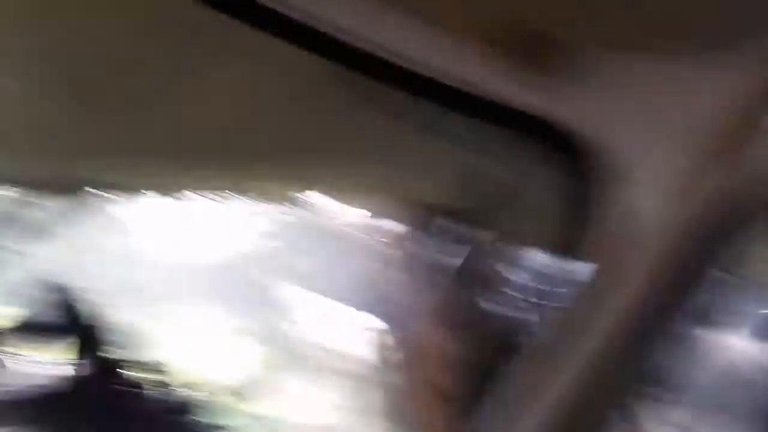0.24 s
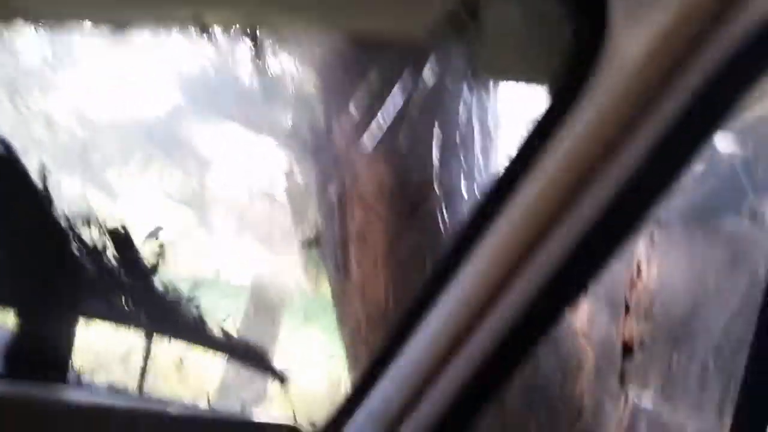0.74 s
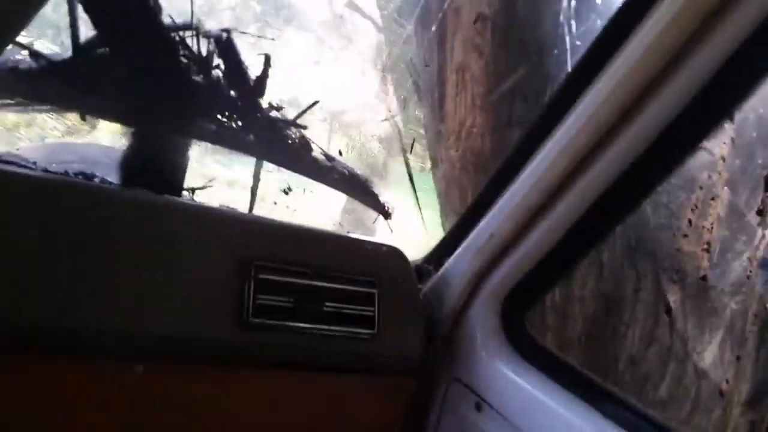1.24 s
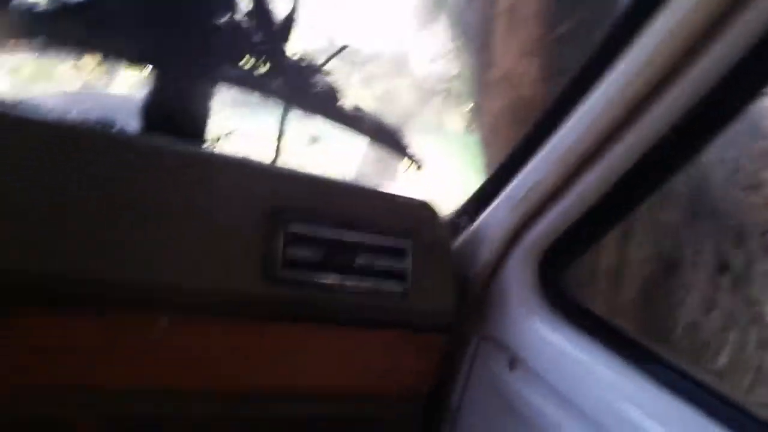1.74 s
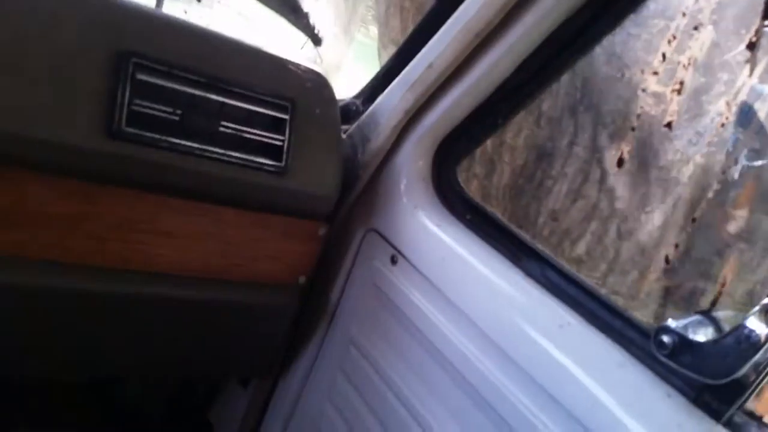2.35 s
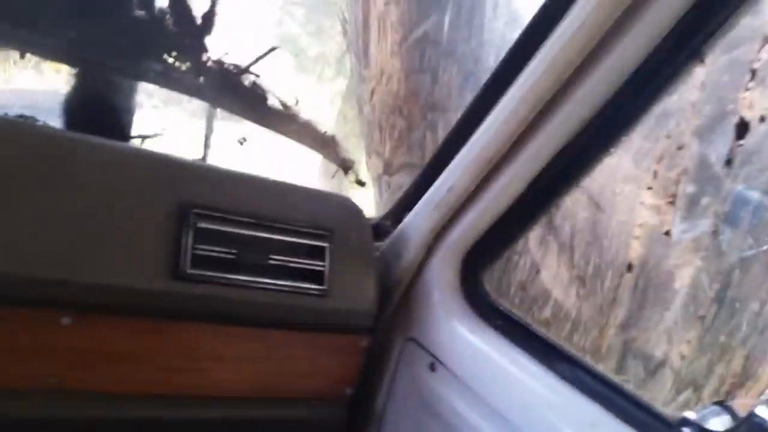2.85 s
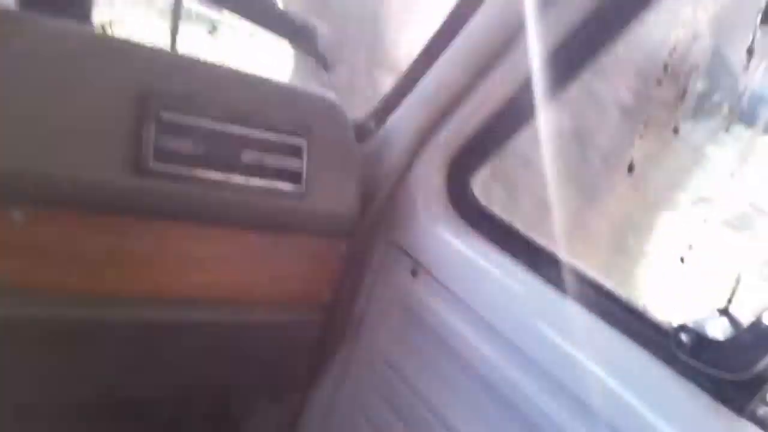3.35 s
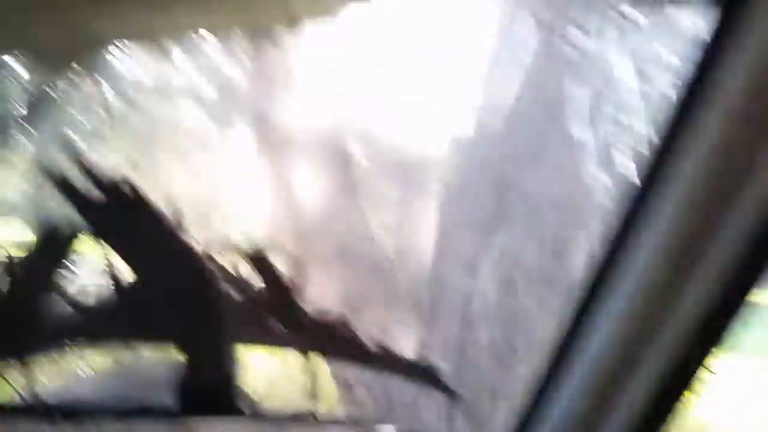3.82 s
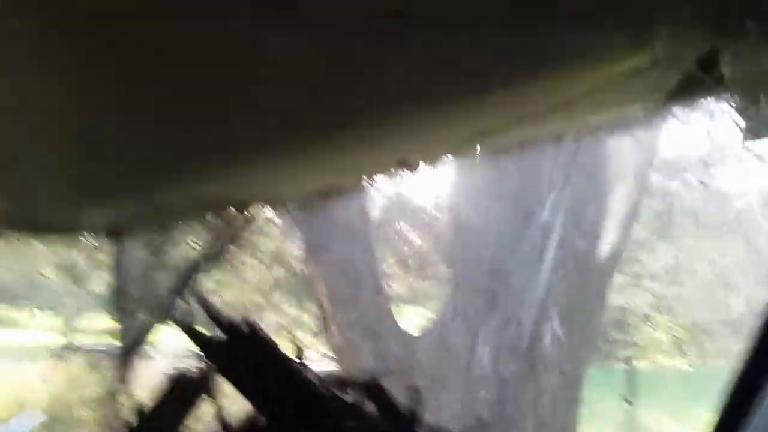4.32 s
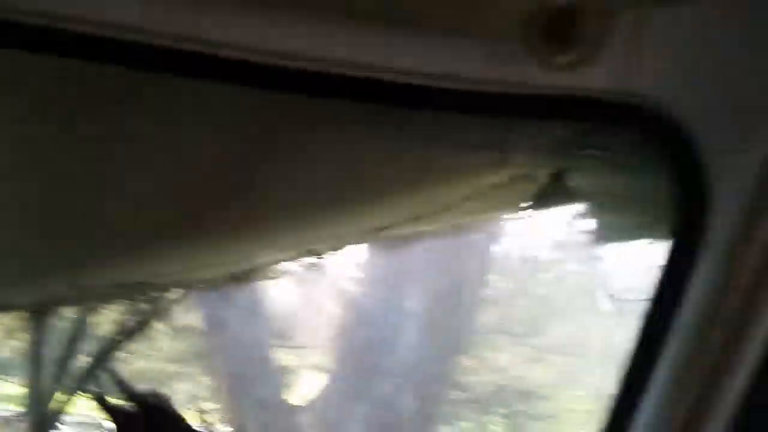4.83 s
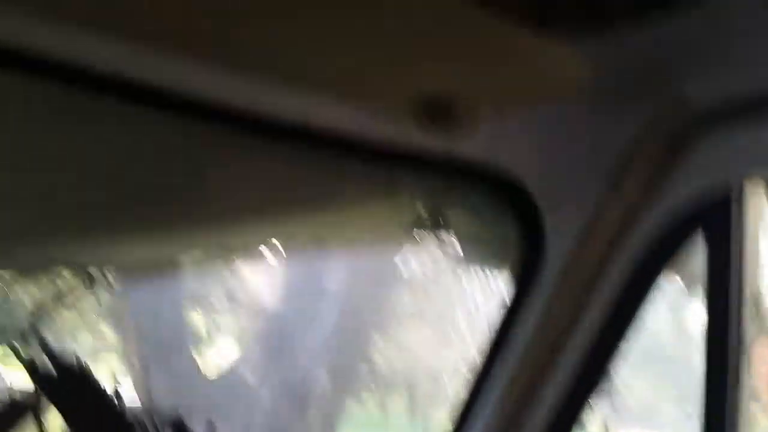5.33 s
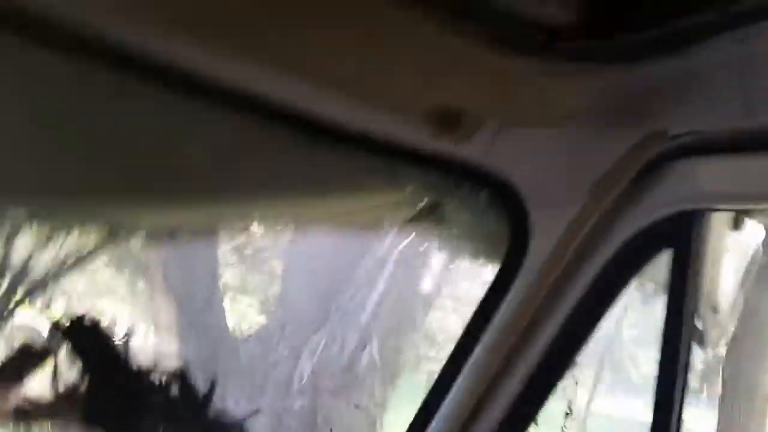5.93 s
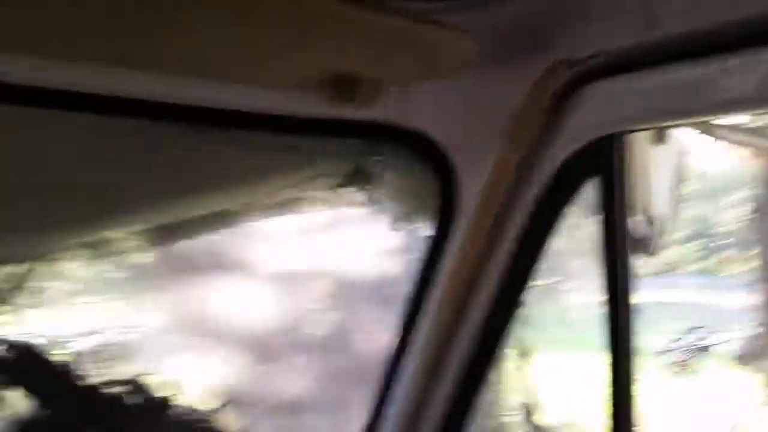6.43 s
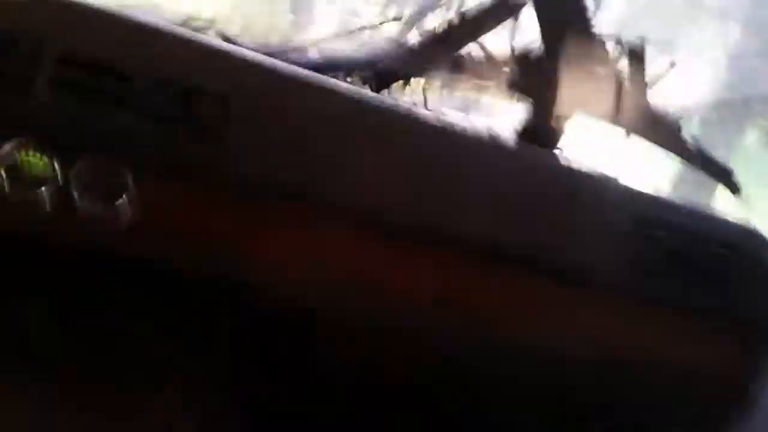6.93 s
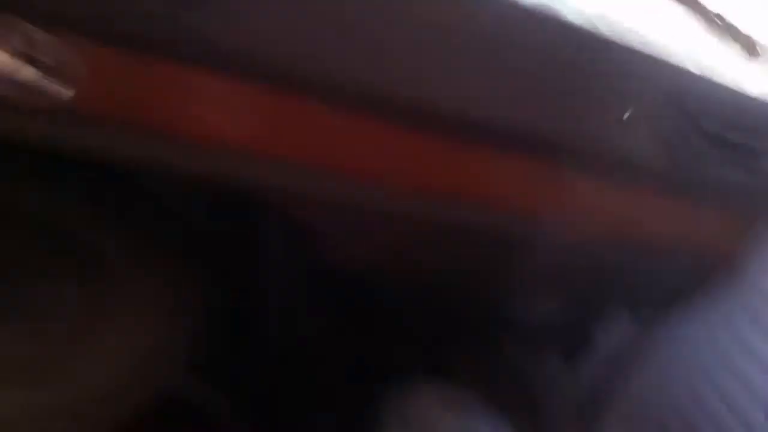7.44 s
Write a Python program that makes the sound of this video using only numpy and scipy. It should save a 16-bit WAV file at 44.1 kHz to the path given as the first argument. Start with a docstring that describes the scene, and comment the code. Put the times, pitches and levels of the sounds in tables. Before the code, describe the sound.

Handheld stereo microphone in a boxy metal cab: heavy uneven engine drone, dominant and bassy, rising, sagging to a lumpy near-idle, then pulling again. Fluttering exhaust-leak hiss rides on it, with key-like rattles, thin wood squeals and a buzzing panel. One dull bump shakes the floor, twigs tap and leaves brush the side, then a late jolt bangs loose trim and doors.

```python
"""Inside the cab of an old V8 truck crawling through woods, heard close up through two microphone ports.
From the start the throttle opens and eases: speed and load drive the exhaust's boom and burble and the
cab's drone, a leak on one cylinder bank hisses at its firings, something small rattles brightly,
branches scrape and squeal and a panel buzzes. Before halfway a bump thuds through the floor pan; later
twigs and leaves brush the side, and near the end a jolt sets the cab clattering as the exhaust drops."""
import sys
import numpy as np
from scipy import signal
from scipy.fft import irfft, next_fast_len
from scipy.io import wavfile
from scipy.ndimage import uniform_filter1d

SR = 44100
rng = np.random.default_rng(int(sys.argv[2]) if len(sys.argv) > 2 else 0)


def wrap_up_sound(samples):
    """Save the sound to the file named by the first command line argument, as 16-bit audio."""
    columns = np.atleast_2d(samples).T
    # keep every value between -1 and 1, then stretch to whole-number steps
    tamed = np.clip(columns, -1, 1)
    steps = np.round(tamed * 32767).astype(np.int16)
    wavfile.write(sys.argv[1], SR, steps)


N = 338247
TIME = np.arange(N) / SR  # [s]


def amp(db):
    """Decibels to gain."""
    return np.exp(np.asarray(db) * (np.log(10) / 20))


def evened(x):
    """Scales to rms 1."""
    return x / np.sqrt(np.mean(x ** 2) + 1e-20)


def read(points, hz):
    """Reads a table of (frequency [Hz], value) on a logarithmic frequency axis."""
    f, value = np.transpose(points)
    return np.interp(np.log(hz + 1), np.log(f + 1), value)


def curves(rows):
    """The columns of a table of (time [s], ..) at every sample."""
    s, *columns = np.transpose(rows)
    return [np.interp(TIME, s, column) for column in columns]


def add(mix, s, sound):
    """Mixes a sound in from time s, cut off at the end of the mix."""
    part = mix[..., max(round(s * SR), 0):][..., :sound.shape[-1]]
    part += sound[..., :part.shape[-1]]


def arch(s, length):
    """Swells from zero to one and back over the given time."""
    return np.sin(np.pi * np.clip((TIME - s) / length, 0, 1))


def wander(rate_hz):
    """Smooth chance of rms 1 that changes at about the given rate."""
    points = rng.standard_normal(size=16384)
    return evened(np.interp(TIME * rate_hz, np.arange(len(points)), points))


def colour(x, spectrum, size=16384):
    """Minimum-phase filter with the given spectrum: it rings after each pulse, never before."""
    hz = abs(np.fft.fftfreq(size, 1 / SR))
    log_gain = np.log(amp(read(spectrum, hz)))
    response = np.exp(np.conj(signal.hilbert(log_gain)))
    ring = np.fft.ifft(response).real[:size // 2]
    return signal.oaconvolve(x, ring)[:N]


# likeness of the two microphone ports: (frequency [Hz], likeness [0-1])
PORT_LIKENESS = [(60, 1), (120, 0.75), (240, 0.37), (480, 1), (950, 0.77), (1900, 0.079), (3800, 0),
                 (15000, 0.38)]
# level of the left port over the right: (frequency [Hz], level [dB])
PORT_LEAN = [(60, 4.5), (140, -5), (500, -1.5), (1170, -3.5), (1790, -5.5), (2740, -4), (4190, -4),
             (6400, -9.5), (9800, 9), (12000, 1.5), (15000, -4)]
# phase by which the left port leads: (frequency [Hz], phase [rad])
PORT_LEAD = [(100, 0.03), (400, 0.52), (700, 0.98), (1100, 1.42), (2000, 4.75)]


def noise(spectrum, size=N, ripple_db=1.8, ripple_hz=28):
    """Coloured noise at the two ports, as alike as the table says, rippled by the cab's standing waves."""
    n = next_fast_len(size, True)
    hz = np.fft.rfftfreq(n, 1 / SR)
    a, b, c, d = rng.standard_normal((4, len(hz)))
    ripple = np.interp(hz / ripple_hz, np.arange(2000), rng.uniform(-1.7, 1.7, size=2000))
    ripple *= np.interp(hz, [100, 500, 2500, 9000], [0, 1, 1, .3])
    same = np.clip(read(PORT_LIKENESS, hz), 0, 1)
    lean = amp(read(PORT_LEAN, hz) / 2)
    left = a + 1j * b
    right = same * left + np.sqrt(1 - same ** 2) * (c + 1j * d)
    right = right * np.exp(-1j * read(PORT_LEAD, hz))
    gain = amp(read(spectrum, hz) + ripple_db * ripple)
    ports = np.array([left * lean, right / lean]) * gain
    return evened(irfft(ports, n)[:, :size])


# heaves of the body: (time [s], length [s], level [dB], frequency [Hz])
SWAYS = [(4.792, 0.2, -16, 30.6), (6.817, 0.53, -24, 37.8)]


def sway():
    """The body heaves on its springs: a very deep tone of pressure swells and fades."""
    out = np.zeros(N)
    for s, length, db, hz in SWAYS:
        out += amp(db) * arch(s, length) * np.sin(2 * np.pi * hz * (TIME - s))
    return out


# thin tones: wood squealing on glass and paint, and a cab panel buzzing near 536 Hz:
# (time [s], length [s], level [dB], start [Hz], end [Hz], flutter [0-1])
THIN_TONES = [(0.197, 0.38, -45.5, 1245, 1230, 0.3), (1.471, 0.6, -44, 2245, 2180, 0.86),
              (1.49, 0.78, -52, 2014, 2060, 0.9), (2.43, 0.19, -42, 537, 537, .3),
              (2.634, 0.85, -40.5, 535, 536, 0.4), (2.944, 0.12, -41, 2270, 2190, .6),
              (4.087, 0.27, -49.5, 1233, 1215, 0.4), (4.58, 0.27, -45, 1220, 1223, 0.1),
              (5.13, 0.3, -45.5, 1226, 1223, .3), (7.095, 0.026, -23, 880, 877, .4),
              (7.15, 0.077, -21, 610, 541, 0.4), (7.156, 0.058, -29, 967, 839, 0.16)]


def squeals_and_buzz():
    """Thin tones of wood and panel that swell and glide; the more flutter, the more they waver and spread."""
    out = np.zeros(N)
    drift = np.cumsum(9 * wander(60)) / SR  # 9 Hz rms, counted in turns
    unsteady = (wander(110) + 1j * wander(110)) / np.sqrt(2)
    for s, length, db, start_hz, end_hz, flutter in THIN_TONES:
        glide_hz = np.interp(TIME, [s, s + length], [start_hz, end_hz])
        turns = np.cumsum(glide_hz) / SR + drift
        sway_of_tone = np.sqrt(max(1 - flutter ** 2, 0)) + flutter * unsteady
        tone = (sway_of_tone * np.exp(2j * np.pi * turns)).imag
        out += amp(db) * np.sqrt(abs(arch(s, length))) * tone
    return out


# branches dragging on glass and paint:
# (time [s], length [s], level before the stroke and slips [dB], centre [Hz], width [octaves])
SCRAPES = [(0, 0.14, -32, 476, 0.74), (0.188, 0.044, -35, 9400, 0.058), (0.236, 0.055, -33.5, 955, 0.29),
           (1.472, 0.45, -47, 2180, 0.12), (2.853, 0.59, -42.5, 2100, 0.25), (3.679, 0.12, -36, 540, 0.67),
           (3.881, 0.16, -36.5, 527, 0.82), (3.998, 0.052, -35.5, 1050, 0.22),
           (4.56, 0.037, -33.5, 2380, 0.34), (4.57, 0.036, -31, 930, 1), (4.869, 0.045, -35.5, 680, 0.071),
           (4.881, 0.068, -32, 3500, 0.9), (5.935, 0.071, -31.5, 2660, 0.86), (5.401, 0.88, -41, 577, .15),
           (7.1, 0.045, -24.5, 1990, 0.16), (7.147, 0.09, -28, 585, 0.27), (7.562, 0.18, -36, 570, 0.51)]


def scrapes():
    """A branch catches, slips in small jerks and slides off: a band of noise under a jerky stroke."""
    out = np.zeros((2, N))
    slips = evened(amp(6 * np.tanh(wander(700))))
    hz = np.geomspace(50, 16000, 400)
    for s, length, db, centre_hz, octaves in SCRAPES:
        band_db = -20 * np.log10(1 + (np.log2(hz / centre_hz) / octaves) ** 4)
        window = SR if length > .2 else SR // 5
        progress = np.minimum(TIME[:window] / length, 1)
        stroke = np.sin(np.pi * progress ** .7)
        add(out, s, amp(db) * noise(np.c_[hz, band_db], size=window) * stroke)
    return out * slips


# bumps heavy enough to shake the floor pan: (time [s], relative level [dB])
BUMPS = [(3.662, -1.5), (6.955, -5)]
# the cab's hollow boom: (frequency [Hz], relative level [dB], t60 [s])
PANEL = [(129, -42, 0.38), (170, 3.5, 0.14), (238, -22, 0.3), (283, -23, 0.031)]


def bumps(rise_s=0.0087):
    """The floor pan swells into a short hollow boom of a few decaying modes."""
    out, t = np.zeros(N), TIME[:SR // 2]
    ring = np.zeros(len(t))
    for hz, db, t60 in PANEL:
        ring += amp(db) * np.exp(-np.log(1000) * t / t60) * np.sin(2 * np.pi * hz * t)
    for s, db in BUMPS:
        add(out, s, amp(db) * ring * (1 - np.exp(-t / rise_s)))
    return out * amp([[-1.1], [1.1]])


CLATTER_DB, CLATTER_PER_HARDNESS = -4, 0.44  # harder blows shake more loose trim


def shares(thud_db, hard_db):
    """Relative thud, clatter and crack of a blow in dB, from its strength and hardness."""
    clatter_db = thud_db + CLATTER_DB + CLATTER_PER_HARDNESS * hard_db
    return thud_db, clatter_db, thud_db + hard_db


# blows on the body: (time [s], relative thud level [dB], hardness: relative crack above thud [dB],
# pitch of the struck part [Hz])
BLOWS = [(0.252, -24.5, -13, 329), (3.661, -20, -22, 302), (3.687, -25.5, -19, 560), (3.939, -25, -9, 420),
         (4.459, -27.5, -14, 187), (4.508, -24, -24, 295), (5.674, -25, -25, 245), (6.757, -17, -40, 210),
         (6.801, -16.5, -13.5, 291), (6.836, -10.5, -18.5, 430), (6.873, -16.5, -11, 344),
         (6.91, -14, -14, 400), (6.962, -13.5, -2.5, 248), (7.001, -12, 3.5, 247), (7.027, -20, -14, 476),
         (7.088, -18, 0, 328), (7.128, -12.5, -11.5, 283), (7.166, -21, -7, 404), (7.195, -17.5, -10, 255),
         (7.24, -23, -12, 344), (7.281, -21.5, -14, 513), (7.3, -19, -42, 132), (7.328, -15, -44, 224),
         (7.402, -18, -40, 150), (7.425, -20, -30, 135)]
# modes of doors and dashboard: (frequency [Hz], relative level [dB], t60 [s])
TRIM = [(237, -21, 0.18), (302, 4, 0.42), (385, 19, 0.034), (468, -5, 0.59), (545, 3, 0.23),
        (692, -9, 0.55), (870, -4, 0.23), (1000, -43, 0.11)]


def trim(ring_db=-9, rise_s=0.015, unlike=0.74):
    """Every blow rings the doors and dashboard, each port hearing its own mix of their modes."""
    out, t = np.zeros((2, N)), TIME[:SR // 3]
    rings = np.array([amp(db) * np.sin(2 * np.pi * hz * t) * np.exp(-np.log(1000) * t / t60)
                      for hz, db, t60 in TRIM])
    rings *= 1 - np.exp(-t / rise_s)
    for s, thud_db, hard_db, _ in BLOWS:
        _, clatter_db, _ = shares(thud_db, hard_db)
        signs = rng.choice([-1, 1], size=len(TRIM))
        weights = signs + unlike * rng.standard_normal((2, len(TRIM)))
        add(out, s, amp(clatter_db + ring_db) * weights @ rings)
    return out


# partials of a struck part: (ratio to its pitch, relative level [dB])
KNOCK_PARTIALS = [(1, -4.5), (1.68, -13), (2.37, -23), (3.6, -21)]


def knock(hz, t60, rise_s):
    """A struck part rings at its own pitch; the overtones die sooner, and the left port leads."""
    t, lead = TIME[:SR // 4], np.array([[.5], [-.5]])
    ring = np.zeros((2, len(t)))
    for ratio, db in KNOCK_PARTIALS:
        phase = 2 * np.pi * hz * ratio * t + lead * read(PORT_LEAD, hz * ratio)
        ring += amp(db - 60 * t * ratio / t60) * np.sin(phase)
    return ring * (1 - np.exp(-t / rise_s)) * amp([[-1], [1]])


# twigs tapping the glass: (time [s], relative level [dB], pitch [Hz])
TWIGS = [(4.566, -25, 2230), (4.581, -40, 1060), (4.898, -23, 2210), (5.915, -29, 934), (5.943, -31, 934),
         (6.029, -30, 1030), (6.415, -27, 2210)]


def knocks(part_db=4, part_t60=0.17, shove_db=9, shove_s=0.00099, twig_t60=0.081):
    """Each blow shoves the air once and rings a part with a pitch of its own; twigs tap the glass."""
    out, u = np.zeros((2, N)), TIME[:SR // 20] / shove_s
    shove = u * (2 - u) * np.exp(-u)
    for s, thud_db, _, hz in BLOWS:
        add(out, s, amp(thud_db + part_db) * knock(hz, part_t60, 0.0017))
        add(out, s, amp(thud_db + shove_db) * shove)
    for s, db, hz in TWIGS:
        add(out, s, amp(db) * knock(hz, twig_t60, 0.00033))
    return out


# what a blow sets ringing, low, middle and top: (frequency [Hz], relative level [dB per Hz])
THUD = [(30, 2), (90, 12.5), (165, 3.5), (250, 11.5), (330, 2), (450, 1), (900, -29), (2500, -81)]
CLATTER = [(150, -10), (300, -10), (480, -8.5), (720, -12), (1000, -16.5), (1500, -22.5), (2500, -28),
           (7000, -54)]
CRACK = [(500, -30), (1200, 15.5), (2100, 11.5), (4000, 9.5), (5500, 6.5), (7300, -2), (9500, 6),
         (12500, 20.5), (15000, 17)]
BLOW_T60_S = 0.22  # scaled a little for each of the three bands
# loose things go on rattling through the jolt; levels relative, as in BLOWS
JOLT_S, JOLT_LENGTH_S, JOLT_DB, JOLT_HARD_DB = 6.76, 0.62, -32, -10


def blows(loose_db=3):
    """Blows ring the cab low, the loose trim in the middle, and crack on top; the jolt adds rattling."""
    out, t = np.zeros((2, N)), TIME[:SR // 2]
    loose = arch(JOLT_S, JOLT_LENGTH_S) * evened(amp(loose_db * wander(68)))
    # spectrum, rise [s], share of the t60, gain [dB]
    bands = [(THUD, .003, 1.0, 1), (CLATTER, .002, 1.05, 3), (CRACK, .0008, .9, 5)]
    for k, (spectrum, rise_s, ring, db) in enumerate(bands):
        power = (amp(shares(JOLT_DB, JOLT_HARD_DB)[k]) * loose) ** 2
        fall = (1 - np.exp(-t / rise_s)) * np.exp(-np.log(1000) * t / (BLOW_T60_S * ring))
        for s, thud_db, hard_db, _ in BLOWS:
            add(power, s, (amp(shares(thud_db, hard_db)[k]) * fall) ** 2)
        out += noise(spectrum) * np.sqrt(power) * amp(db)
    return out


# high hiss, shared by the small rattle and the exhaust leak: (frequency [Hz], relative level [dB per Hz])
HISS = [(1500, -29), (4500, -17), (6800, -25), (8200, -15), (9600, -15), (10800, -1.5), (11800, 7),
        (13200, 13), (14600, 9.5), (16000, -16)]
# bright ticks of something small rattling, such as keys: (time [s], relative level [dB])
RATTLES = [(0.443, -19), (0.844, -18), (1.063, -17), (1.686, -19), (1.957, -23), (2.124, -21), (2.207, -18),
           (2.37, -21), (2.528, -12), (2.902, -21), (2.922, -21), (4.087, -15.5), (4.242, -20),
           (4.392, -16), (4.541, -13), (5.938, -14), (6.071, -16), (7.383, -17), (7.447, -23),
           (7.465, -12.5), (7.55, -20), (7.633, -14)]


def small_rattle(fade_s=0.0059, tick_db=-2):
    """Something small, such as keys, rattles in bright ticks: short bursts of high hiss."""
    level, t = np.zeros(N), TIME[:SR // 8]
    burst = np.exp(-t / fade_s) - np.exp(-t / 0.00048)
    for s, db in RATTLES:
        add(level, s, amp(db + tick_db) * burst)
    return noise(HISS) * level


# push of each cylinder in firing order, the second weak when pulling: (pulling, near idle), relative
CYLINDERS = [(0.93, 0.59), (0.52, 1.09), (1.09, 0.2), (0.82, 0.58), (1.53, 1), (1.43, 0.075), (0.79, 0.11),
             (1.125, 1.44)]


def pulses(firings, place):
    """Samples at which the engine passes the given place in its cycle."""
    return np.flatnonzero(np.diff(np.floor((firings - place) / len(CYLINDERS))) > 0)


# spectra of running gear, cab panels and bulkhead: (frequency [Hz], relative level [dB per Hz])
RUMBLE = [(12, -33), (27, -15), (45, 7), (70, 6.5), (140, 1.5), (200, -2.5), (280, -14.5), (400, -29),
          (800, -29.5), (2000, -75)]
DRONE = [(100, -41), (270, 11), (420, -4), (480, -2), (570, -1), (680, -2.5), (860, -4), (1100, -8.5),
         (1400, -11), (2500, -14), (6000, -66)]
ROAR = [(500, -7.5), (1200, 2), (1600, 2.5), (2150, 3.5), (2700, 0), (3800, -4.5), (5000, -7),
        (6200, -14.5), (7200, -19), (10000, -5)]


def machinery(firings, jets, idle, burble_db, drone_db, roar_db, throb=0.1, jet_share=0.078, grit_db=1.37):
    """Running gear rumbles, panels drone with the firings, the engine roars through the bulkhead."""
    rumble = noise(RUMBLE) * amp(burble_db - 13 - 10 * (1 - idle))
    beat = 1 + throb * np.cos(2 * np.pi * firings)
    drone = noise(DRONE) * evened(beat * amp(1.4 * wander(45))) * amp(drone_db - 3 + 8 * idle)
    pulsing = 1 - jet_share + jet_share * jets
    roar = noise(ROAR) * evened(pulsing * amp(grit_db * wander(300))) * amp(roar_db)
    return rumble + drone + roar


# the panels' growl, and panels shaken only while lugging: (frequency [Hz], relative level [dB per Hz])
GROWL = [(120, -40.5), (220, -3.5), (280, 6), (345, -7.5), (405, -1.5), (450, -8.5), (480, -23.5),
         (530, -11), (575, -37.5), (650, -25.5), (1500, -49)]
LUGGING = [(110, -26), (160, 4.5), (215, -7), (262, 5.5), (310, 0), (360, -6.5), (450, -27), (900, -59)]


def growl(firings, growl_db, lug_db, place=0.485, lugging_db=-1):
    """Panels shake in step with the cylinders in close overtones; lower panels join when it lugs."""
    shakes = np.zeros(N)
    for k, (pulling, _) in enumerate(CYLINDERS):
        at = pulses(firings, k + place)
        shakes[at] = pulling - .87 + .05 * rng.standard_normal(size=200)[:len(at)]
    shake = evened(colour(shakes, GROWL))
    shake += (amp(lug_db) - 1) * amp(lugging_db) * evened(colour(shakes, LUGGING))
    return shake * amp(growl_db) * amp([[-1], [1]])


# firings of the leaking bank: (place in the cycle [firings], relative level, evened out near idle [dB])
LEAKS = [(1.15, -5.5), (3.1, 0), (4.15, -8.5), (6.2, -6)]
LEAK_GAIN_DB = 5
# twigs and leaves brush the side; shares are of the hiss power, during the brushing and otherwise
BRUSH_START_S, BRUSH_END_S, BRUSH_FADE_S, BRUSH_SHARE, BRUSH_REST = 5.2, 7.7, 0.94, 0.26, 0.032


def leak(firings, idle, leak_db, fade_s=0.013, steady=0.2, scatter_db=3.56, grit_db=-0.5):
    """Each firing of the leaking bank spits a jet of hiss that dies away in the cab."""
    kicks = np.zeros(N)
    for place, db in LEAKS:
        at = pulses(firings, place)
        contrast = 1 - 0.95 * idle[at]  # the worst cylinder stands out most when pulling
        scatter = scatter_db * rng.standard_normal(size=200)[:len(at)]
        kicks[at] = amp(db * contrast + scatter)
    t, rise_s = TIME[:SR // 8], .0008
    jet = np.exp(-t / fade_s) - np.exp(-t / rise_s)
    power = signal.oaconvolve(kicks ** 2, jet ** 2)[:N]
    power = power / (uniform_filter1d(power, size=11000) + 1e-9)  # level over a quarter second
    jets = np.sqrt(abs(power) + steady) / np.sqrt(1 + steady)
    # twigs and leaves brushing the side add a steadier hiss
    contact = np.clip(np.minimum(TIME - BRUSH_START_S, BRUSH_END_S - TIME) / BRUSH_FADE_S, 0, 1)
    share = BRUSH_REST + (BRUSH_SHARE - BRUSH_REST) * contact
    spit = evened(np.sqrt((1 - share) * jets ** 2 + share) * amp(grit_db * wander(430)))
    return noise(HISS) * spit * amp(leak_db + LEAK_GAIN_DB), jets


# the exhaust pipe: (frequency [Hz], relative level [dB per Hz])
PIPE = [(15, -39.5), (27, 2), (55, 1.5), (88, 9.5), (118, 8.5), (145, 12.5), (170, 3.5), (205, -5),
        (240, -10), (283, -9), (345, -14.5), (410, -17), (520, -30), (1500, -59.5)]
# the air in the cab, rung by uneven firings at low speed: (frequency [Hz], relative level [dB per Hz])
CAB = [(25, -44.5), (58, -10.5), (76, 6.5), (94, -7), (130, -8.5), (300, -50.5), (900, -99)]


def exhaust(firings, idle, boom_db, burble_db, place=0.497, second_db=-11, third_db=-22,
            waver_db=-0.2, cab_db=-5.0):
    """An even boom at the firing rate, and the burble of cylinders that push unequally."""
    push = np.zeros(N)
    uneven = np.array(CYLINDERS) - np.mean(CYLINDERS, axis=0)
    for k, (pulling, idling) in enumerate(uneven):
        at = pulses(firings, k + place)
        chance = rng.standard_normal(size=200)[:len(at)]
        scatter = .05 + .13 * idle[at]
        push[at] = pulling + (idling - pulling) * idle[at] + chance * scatter
    burble = colour(push, PIPE)
    burble /= np.sqrt(uniform_filter1d(burble ** 2, size=14000) + 1e-14)  # level over a third of a second
    turn = 2 * np.pi * firings
    overtones = amp(third_db) * np.sin(3 * turn) - amp(second_db) * np.sin(2 * turn)
    # the boom falls half a turn behind above the cab's resonance
    lag = np.pi * np.clip(1.53 * (1 - idle), 0, 1)
    boom = np.sqrt(2) * np.cos(turn - 4.2 - lag) * amp(boom_db + waver_db * wander(24))
    boom += evened(colour(push, CAB)) * idle ** 2 * amp(boom_db + cab_db)
    # pulling hard, the weak cylinder makes the exhaust lope once a cycle
    lope = 1 + .2 * (1 - idle) * np.cos(2 * np.pi * (firings - 2.7) / len(CYLINDERS))
    rough = (burble + np.sqrt(2) * overtones) * amp(burble_db - 10.5)
    return lope * boom * amp([[-.5], [.5]]) + lope * rough * amp([[-1.1], [1.1]])


CRUISE_HZ, CRUISE_WORK_DB = 80, -45  # firings a second, and the work that counts as no extra load


def follow(law, firing_hz, load_db):
    """Level in dB of a layer that follows engine speed and load."""
    cruise_db, per_octave, per_load = law
    return cruise_db + per_octave * np.log2(firing_hz / CRUISE_HZ) + per_load * load_db


# engine speed, eight firings to a cycle: (time [s], firings a second [Hz])
SPEED = [(0.0, 100.36), (0.52, 93.71), (0.71, 98.66), (1.04, 75.84), (1.26, 80.67), (1.51, 41.43),
         (1.82, 90.78), (2.16, 97.47), (3.16, 105.46), (3.59, 71.18), (3.83, 43.1), (4.27, 52.96),
         (4.5, 52.69), (4.85, 71.47), (5.15, 50.36), (5.95, 57.15), (6.27, 81.63), (6.56, 87.77),
         (6.85, 78.22), (7.14, 95.37), (7.67, 95.97)]
# how hard the engine works: (time [s], work [dB], hiss of the exhaust leak before LEAK_GAIN_DB [dB])
EFFORT = [(0.0, -40.5, -32), (0.45, -44, -35), (1.17, -46, -35), (1.42, -50, -45), (1.72, -45.5, -33.5),
          (2.3, -42.5, -33), (3.15, -42, -29.5), (3.65, -48, -45), (3.95, -47.5, -41.5), (4.38, -47.5, -41),
          (4.68, -42.5, -31), (5.0, -40.5, -35), (5.45, -41.5, -33), (5.85, -42, -30.5), (6.1, -40, -25.5),
          (6.45, -41, -27.5), (6.8, -41.5, -33), (7.1, -44, -30.5), (7.67, -46.5, -31.5)]
# the engine lugs and the panels growl harder: (time [s], length [s], strength [dB])
LUGS = [(0.643, 0.54, 15.5), (1.66, 0.48, 11), (4.444, 0.75, 7), (5.912, 1, 4)]
LUG_BOOM, LUG_BURBLE = 0.13, 0.46  # dB of boom and burble for each dB of that strength
# the load comes off at the jolt and the exhaust drops
LIFT_S, LIFT_LENGTH_S, LIFT_DB = 6.805, 0.6, -12
# the cab resonates with firings near 75 a second: (firing rate [Hz], boom level at cruising load [dB])
BOOM = [(44, -25.5), (53, -21), (68, -18), (79, -14), (90, -18.5), (104, -28.5)]
BOOM_PER_LOAD = 0.68  # dB for each dB of load
# base level of each layer:
# (level at cruise [dB], slope with speed [dB per octave], slope with load [dB per dB])
BURBLE_LAW = (-13.5, 2.4, 0.79)
DRONE_LAW = (-39.5, 8.5, 1)
ROAR_LAW = (-39.5, 0.49, 1.285)
GROWL_LAW = (-43, 25.8, 0.51)


def scene():
    """The crankshaft times the engine layers, speed and load set their levels; the rest is mixed in."""
    firing_hz, = curves(SPEED)
    work_db, leak_db = curves(EFFORT)
    load_db = work_db - CRUISE_WORK_DB
    lug_db = sum(db * arch(s, length) for s, length, db in LUGS)
    lift_db = LIFT_DB * abs(arch(LIFT_S, LIFT_LENGTH_S)) ** 0.89
    boom_db = read(BOOM, firing_hz) + BOOM_PER_LOAD * load_db + LUG_BOOM * lug_db + lift_db
    burble_db = follow(BURBLE_LAW, firing_hz, load_db) + LUG_BURBLE * lug_db + lift_db / 2
    drone_db = follow(DRONE_LAW, firing_hz, load_db)
    roar_db = follow(ROAR_LAW, firing_hz, load_db)
    growl_db = follow(GROWL_LAW, firing_hz, load_db)
    firings = np.cumsum(firing_hz) / SR
    idle = np.clip((92 - firing_hz) / 34, 0, 1)  # slow running is lumpier
    hiss, jets = leak(firings, idle, leak_db)
    background = sway() + squeals_and_buzz() + scrapes()
    body = bumps() + trim() + knocks() + blows() + small_rattle()
    engine = machinery(firings, jets, idle, burble_db, drone_db, roar_db)
    engine = engine + growl(firings, growl_db, lug_db) + hiss
    return background + body + engine + exhaust(firings, idle, boom_db, burble_db)


EDGE_HZ = 14700


def record(dry):
    """Full-scale clipping at the microphone ports, then a steep low-pass at the band limit."""
    edge = signal.firwin(601, EDGE_HZ, window=("kaiser", 7), fs=SR)
    return signal.oaconvolve(np.clip(dry, -1, 1), edge[None], "same")


dry = scene()
out = record(dry)
wrap_up_sound(out)
```